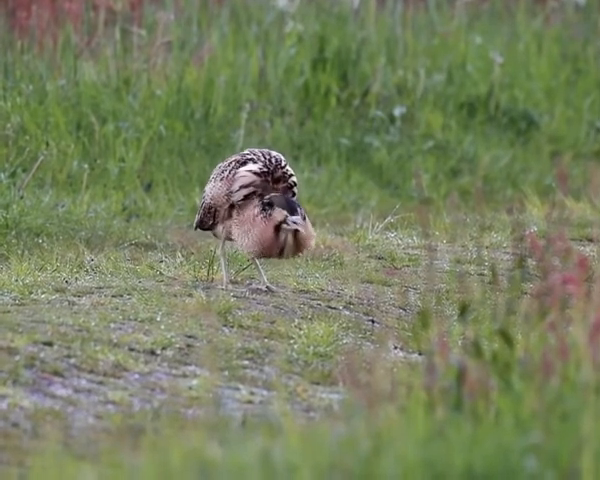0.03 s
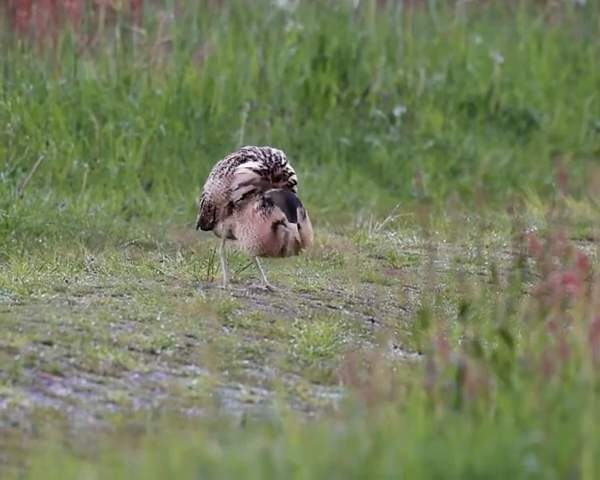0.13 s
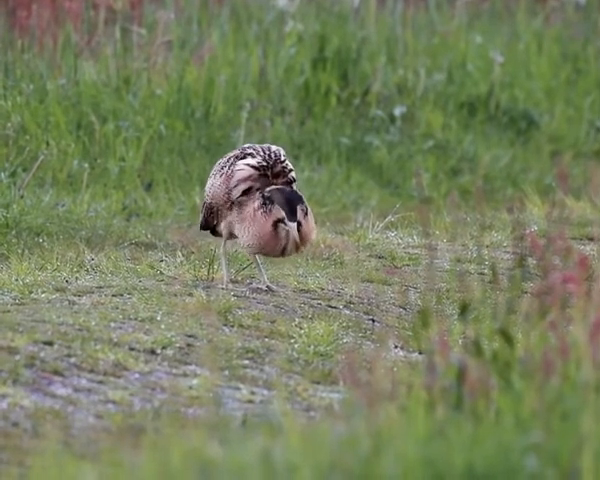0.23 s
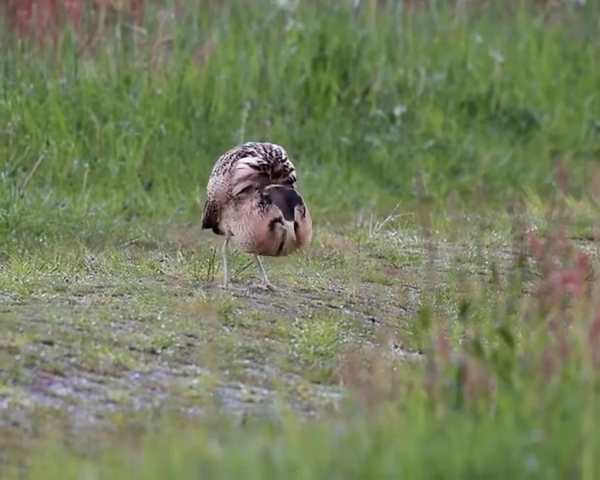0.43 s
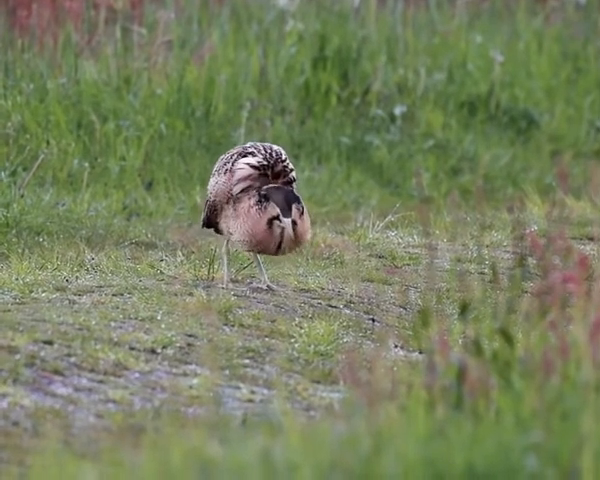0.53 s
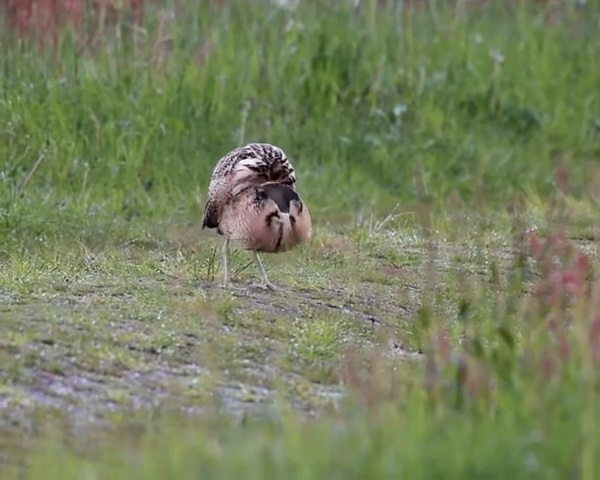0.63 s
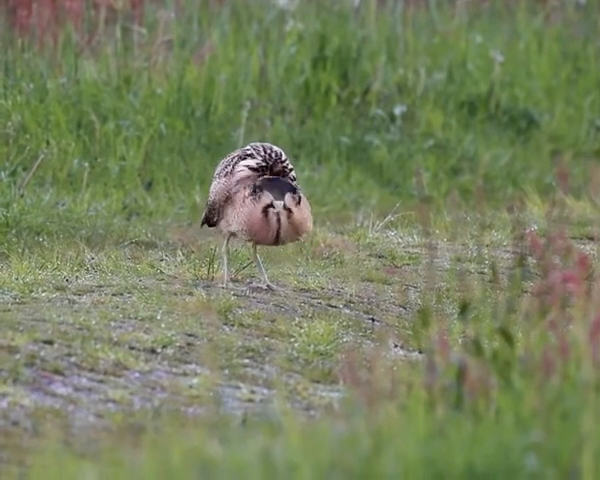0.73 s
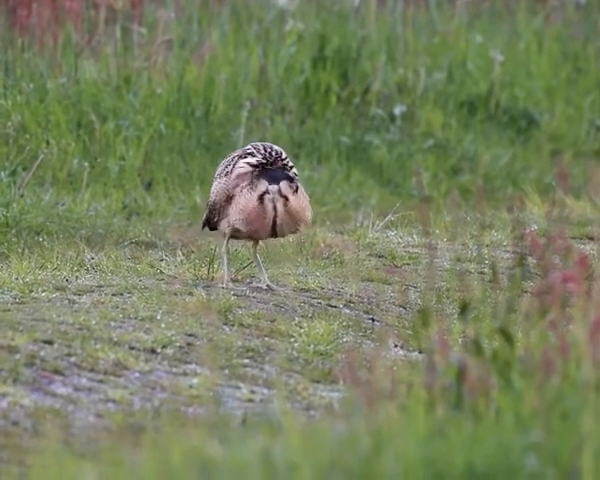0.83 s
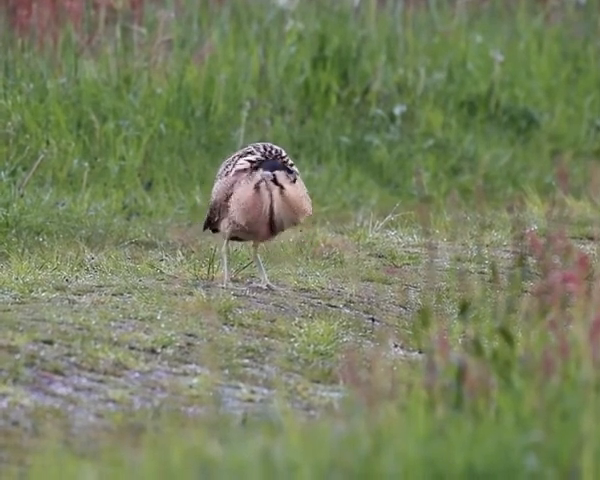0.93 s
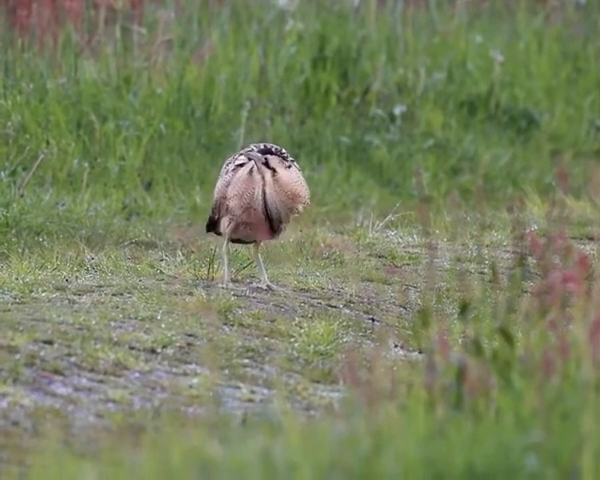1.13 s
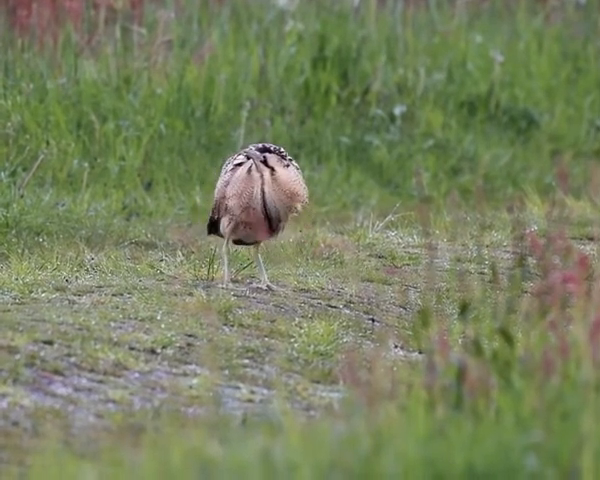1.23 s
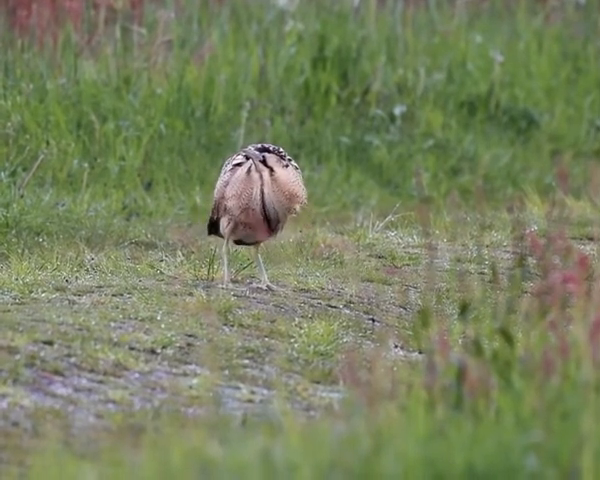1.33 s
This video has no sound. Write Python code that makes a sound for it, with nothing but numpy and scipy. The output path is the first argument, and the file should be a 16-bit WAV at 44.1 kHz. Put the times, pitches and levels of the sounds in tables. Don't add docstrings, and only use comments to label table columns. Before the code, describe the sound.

A bittern's single deep, pure boom throbs up and rings out over chirping meadow birds

```python
import sys
import numpy as np
from scipy import signal
from scipy.fft import rfft, irfft
from scipy.io import wavfile
from scipy.ndimage import uniform_filter1d

SR = 44100
rng = np.random.default_rng(int(sys.argv[2]) if len(sys.argv) > 2 else 0)


def to_linear_factor(level_db):
    exponent = np.asarray(level_db, float) / 20
    return 10 ** exponent


def master(y):
    cut = np.clip(np.atleast_2d(y).T, -1, 1)
    pcm = np.round(cut * 32767)
    wavfile.write(sys.argv[1], SR, pcm.astype(np.int16))


N = 61739
T = np.arange(N) / SR

# (centre [Hz], half width [Hz], depth [dB])
SPECTRUM_GAPS = [(2600, 70, -27), (2618, 350, -8.5), (7520, 170, -42), (7950, 360, -8)]


def walk(rate_hz):
    k = int(SR / rate_hz)
    w = uniform_filter1d(uniform_filter1d(rng.standard_normal(N), k), k)
    return (w - w.mean()) / w.std()


def colour(points):
    hz, db = np.array(points, float).T
    f = np.maximum(np.fft.rfftfreq(N, 1 / SR), 1)
    gain = to_linear_factor(np.interp(np.log(f), np.log(hz), db))
    gain = gain * np.minimum(f / hz[0], 1) ** 2
    return irfft(rfft(rng.standard_normal(N)) * gain, N) * np.sqrt(SR / 2)


def sine(hz, lag_s=0.):
    cycles = np.cumsum(hz) / SR - hz * lag_s
    return np.sqrt(2) * np.sin(2 * np.pi * cycles)


def gate(start_s, length_s, edge_s):
    to_edge_s = np.minimum(T - start_s, start_s + length_s - T)
    return np.sin(np.pi / 2 * np.clip(to_edge_s / edge_s, 0, 1)) ** 2


def curve(rows):
    time_s, *columns = np.array(rows, float).T
    return [uniform_filter1d(np.interp(T, time_s, c), SR // 250) for c in columns]


def sac_tone(hz, db, leak_db, env):
    overtone_db, leak_lag_s = -62, .00016
    level = to_linear_factor(db) * env
    left = level * to_linear_factor(leak_db) * sine(hz, leak_lag_s)
    right = level * (sine(hz) + to_linear_factor(overtone_db) * sine(2 * hz))
    return np.array([left, right])


def boom():
    # (time [s], pitch [Hz], level [dB], left leak [dB])
    boom_rows = [
        (.19, 134, -44, -12),
        (.197, 127, -23.5, -12.5),
        (.25, 140, -13, -18.5),
        (.29, 157, -7.4, -20),
        (.36, 154, -4.9, -18.7),
        (.458, 152.5, -6.3, -17),
        (.467, 152.5, -5.2, -17.2),
        (.622, 150.6, -8.1, -17),
        (.8, 149, -50, -16),
    ]
    throb_rate_hz, throb_peak_s, throb_ends_s, throb_fade_s = 27.5, .246, .305, .009
    throb_db, throb_pitch_hz, throb_lead_s = 3, 10, .002
    waver_db, waver_hz = .22, 1.6
    hz, db, leak_db = curve(boom_rows)
    fade = 1 / (1 + np.exp((T - throb_ends_s) / throb_fade_s))

    def throb(lead_s):
        return fade * np.cos(2 * np.pi * throb_rate_hz * (T - throb_peak_s + lead_s))

    hz = hz + throb_pitch_hz * throb(throb_lead_s) + waver_hz * walk(62)
    db = db + throb_db * throb(0) + waver_db * walk(55)
    return sac_tone(hz, db, leak_db, gate(boom_rows[0][0] - .004, .66, .0078))


def intake():
    # (time [s], pitch [Hz], level [dB], left leak [dB])
    intake_rows = [
        (0, 199, -28, -16),
        (.052, 190.5, -29.5, -18),
        (.064, 185, -36.5, -9),
        (.078, 180, -30, -13),
        (.098, 180, -34.5, -20),
        (.116, 180, -64, -19),
    ]
    return sac_tone(*curve(intake_rows), gate(-1, 1.125, .01))


def songbird():
    # (time [s], pitch [Hz], level [dB])
    phrase_a = [(.605, 6210, -59.5), (.633, 5765, -44), (.657, 5840, -49), (.664, 5640, -53),
                (.671, 5430, -39), (.681, 5320, -52.5), (.693, 5530, -39), (.701, 6300, -55),
                (.714, 7020, -53)]
    phrase_b = [(0.794, 6480, -32), (0.8, 6420, -45.5), (0.812, 6420, -40.5), (0.822, 5980, -44.5),
                (0.838, 5790, -40), (0.846, 5950, -42.5), (0.858, 6840, -51), (0.876, 6630, -61),
                (0.885, 7000, -66)]
    phrase_c = [(0.96, 6174, -72), (0.966, 6112, -48), (0.978, 5950, -35.5), (0.984, 5865, -50),
                (0.994, 5536, -30), (1.006, 5130, -47.5), (1.03, 5030, -44), (1.04, 5010, -49),
                (1.06, 4800, -61)]
    phrase_d = [(1.118, 4650, -65), (1.138, 4743, -42), (1.149, 4806, -35), (1.181, 5154, -34),
                (1.199, 5270, -36.5), (1.233, 5420, -35), (1.246, 5490, -42.5), (1.269, 5550, -61),
                (1.277, 5460, -51)]
    song_db, flutter_db = 6, -.2
    out = 0
    for rows in (phrase_a, phrase_b, phrase_c, phrase_d):
        hz, db = curve(rows)
        start_s, end_s = rows[0][0], rows[-1][0]
        level = to_linear_factor(db + song_db + flutter_db * walk(150))
        out = out + sine(hz) * level * gate(start_s, end_s - start_s, .005)
    return out


def chirps():
    # (time [s], length [s], from [Hz], to [Hz], level [dB])
    chirp_rows = [(0.009, 0.097, 4600, 4470, -52.5), (.056, 0.095, 5800, 5700, -55),
                  (0.141, .045, 5965, 5856, -40), (0.205, 0.013, 6810, 6250, -50.5),
                  (0.25, 0.018, 4860, 5090, -52.5), (0.256, .024, 5980, 5920, -57.5),
                  (0.299, 0.049, 7140, 5820, -50), (.354, .024, 3806, 4950, -57),
                  (0.432, 0.026, 7020, 6100, -46), (.538, 0.021, 4340, 4960, -53.5),
                  (0.549, 0.037, 7130, 5150, -47), (0.661, 0.0095, 6400, 6450, -44),
                  (0.728, 0.028, 4940, 5100, -48.5), (0.729, 0.02, 5950, 5930, -49.5),
                  (0.836, 0.02, 3900, 4830, -52), (0.842, .026, 5700, 6000, -58),
                  (1.019, 0.015, 4330, 5020, -47), (1.18, .02, 4700, 5060, -58),
                  (1.193, 0.011, 4080, 3460, -46.5), (1.205, 0.021, 3650, 3100, -59),
                  (1.254, 0.089, 3205, 3810, -63.5), (1.319, 0.02, 5100, 5140, -54),
                  (1.336, 0.021, 3890, 3330, -44), (1.345, 0.026, 3320, 3970, -43.5)]
    glide_bend = 1.4
    flutter = to_linear_factor(2 * walk(130))
    out = 0
    for start_s, length_s, from_hz, to_hz, db in chirp_rows:
        u = np.clip((T - start_s) / length_s, 0, 1)
        hz = from_hz + (to_hz - from_hz) * u ** glide_bend
        out = out + to_linear_factor(db) * gate(start_s, length_s, .3 * length_s) * sine(hz)
    return flutter * out


def croaks():
    # (time [s], length [s], pitch [Hz], level [dB])
    croak_rows = [
        (.275, .047, 992, -36.5),
        (0.815, 0.043, 992, -50.5),
    ]
    arch, sag, upper_ratio, upper_db = .035, .11, 3.03, -8
    rattle_hz, rattle_depth = 88, .3
    out = 0
    for start_s, length_s, pitch_hz, db in croak_rows:
        u = np.clip((T - start_s) / length_s, 0, 1)
        hz = pitch_hz * (1 + arch * np.sin(np.pi * u)) * (1 + .0097 * walk(150))
        rattle = 1 - rattle_depth * np.cos(2 * np.pi * rattle_hz * (T - start_s))
        lower = rattle * sine(2 * hz * (1 - sag * u ** 3))
        upper = to_linear_factor(upper_db - 3.7 * abs(u - .4) + 3.2 * walk(200)) * sine(upper_ratio * hz)
        out = out + to_linear_factor(db) * gate(start_s, length_s, .0093) * (lower + upper)
    return out


def meadow(x):
    t60_s, scatter_db = .11, -12.5
    t = T[:SR // 3]
    tail = rng.standard_normal(len(t)) * to_linear_factor(-60 * t / t60_s) * (t > .004)
    tail = tail / np.sqrt(np.sum(tail ** 2))
    return x + to_linear_factor(scatter_db) * signal.fftconvolve(x, tail)[:N]


def air():
    # (frequency [Hz], density [dB per Hz])
    air_density = [(30, -67.5), (55, -67), (150, -72.5), (400, -87), (2000, -97.5), (5500, -89),
                   (7300, -100), (9500, -118)]
    gust_db, chorus_db = 3, 1.5
    x = colour(air_density)
    low = signal.sosfiltfilt(signal.butter(2, 800, fs=SR, output="sos"), x)
    return low * to_linear_factor(gust_db * walk(8.9)), (x - low) * to_linear_factor(chorus_db * walk(8))


def hiss():
    # (frequency [Hz], density [dB per Hz])
    hiss_density = [(30, -77.5), (60, -67.5), (150, -74), (350, -82.5), (1200, -92.5), (4500, -96),
                    (10000, -96.5), (15500, -101)]
    return colour(hiss_density)


def scene():
    bird_leak_db, air_leak_db = -27, -9
    birds = meadow(songbird() + chirps() + croaks())
    rumble, chorus = air()
    left = to_linear_factor(bird_leak_db) * birds + to_linear_factor(air_leak_db) * rumble + hiss()
    right = birds + rumble + chorus + hiss()
    return boom() + intake() + np.array([left, right])


def masking(x):
    low_hz, high_hz = 5850, 8150
    mask_db = np.array([-38, -35.5])
    floor_db = -79
    f, _, z = signal.stft(x, SR, nperseg=1024)
    power = uniform_filter1d(abs(z) ** 2, size=5, axis=1) * 20 / 3
    whistle = power[:, (f > 4400) & (f < 7200)].max(axis=(0, 1))
    limit = whistle * to_linear_factor(2 * mask_db)[:, None, None] + to_linear_factor(2 * floor_db)
    gap_hz, gap_width_hz, _ = SPECTRUM_GAPS[0]
    maskable = (f > low_hz) & (f < high_hz) | (abs(f - gap_hz) < gap_width_hz)
    drop = (power < limit) & maskable[:, None]
    return signal.istft(z * ~drop, SR, nperseg=1024)[1][:, :N]


def top_cut(x):
    return signal.sosfilt(signal.butter(12, 15670, fs=SR, output="sos"), x)


def record(dry):
    f = np.fft.rfftfreq(N, 1 / SR)
    db = sum(depth_db * np.exp(-((f - hz) / width_hz) ** 2) for hz, width_hz, depth_db in SPECTRUM_GAPS)
    mix = masking(irfft(rfft(dry) * to_linear_factor(db), N))
    return top_cut(mix)


dry = scene()
out = record(dry)
master(out)
```